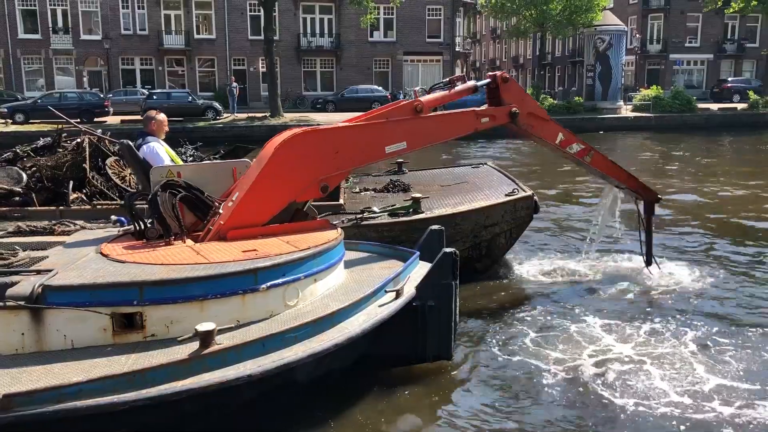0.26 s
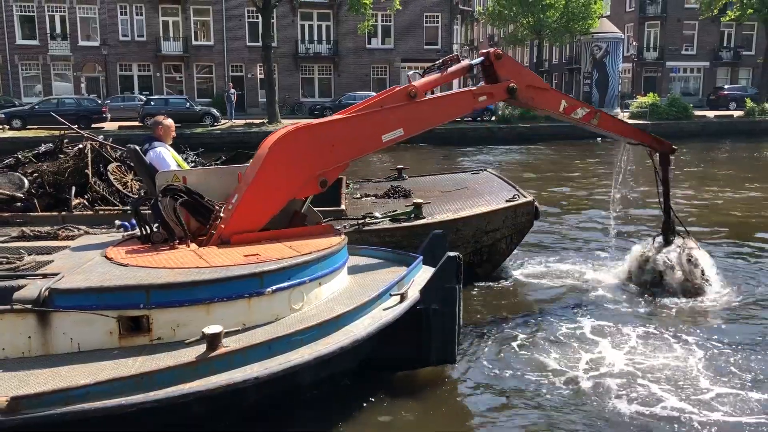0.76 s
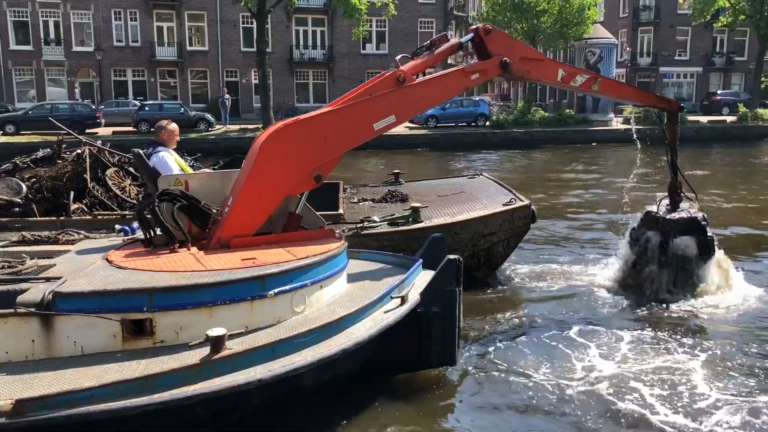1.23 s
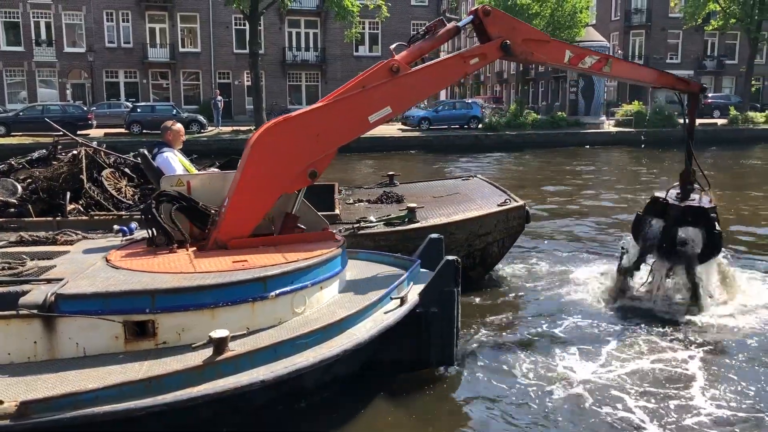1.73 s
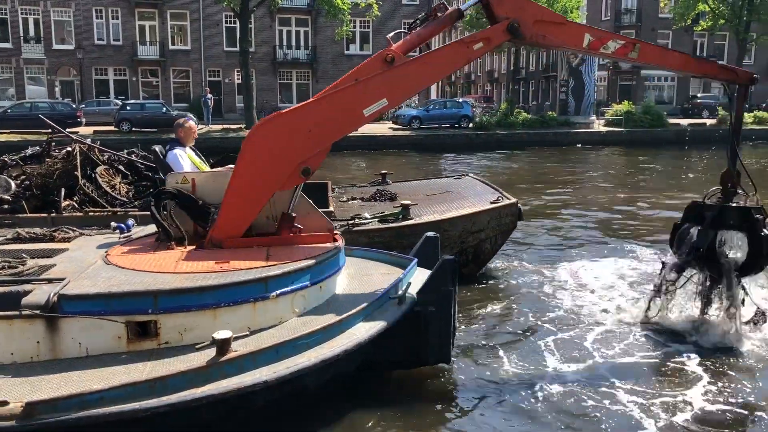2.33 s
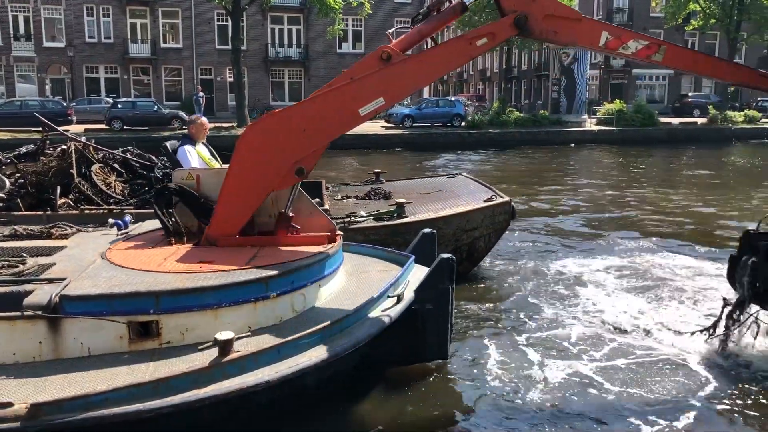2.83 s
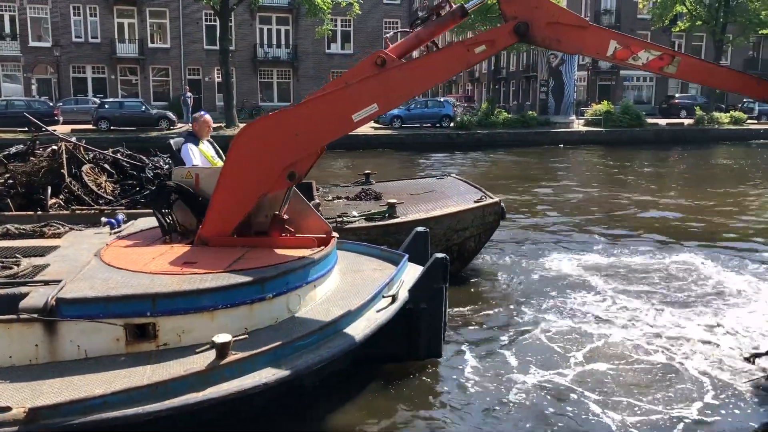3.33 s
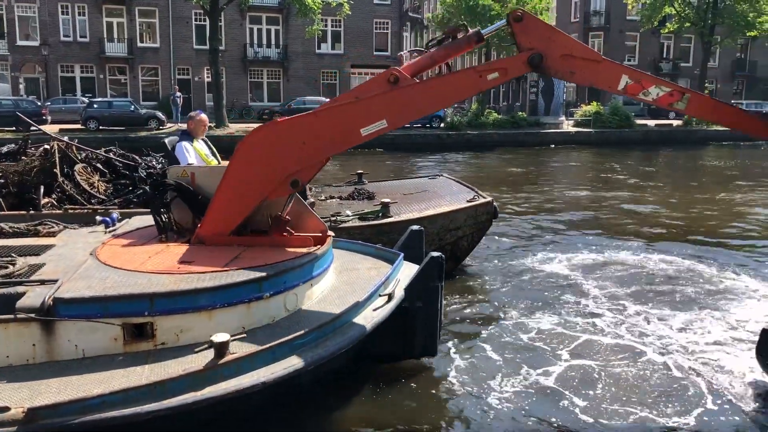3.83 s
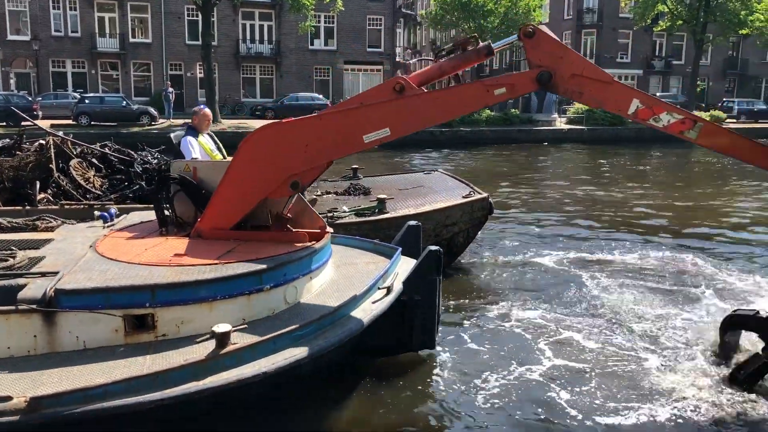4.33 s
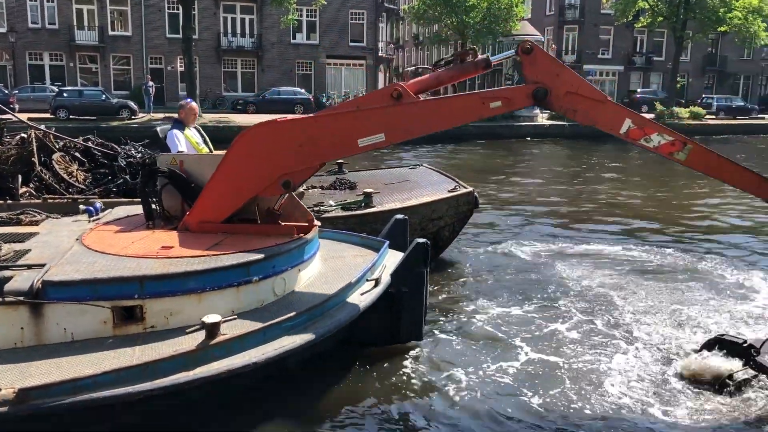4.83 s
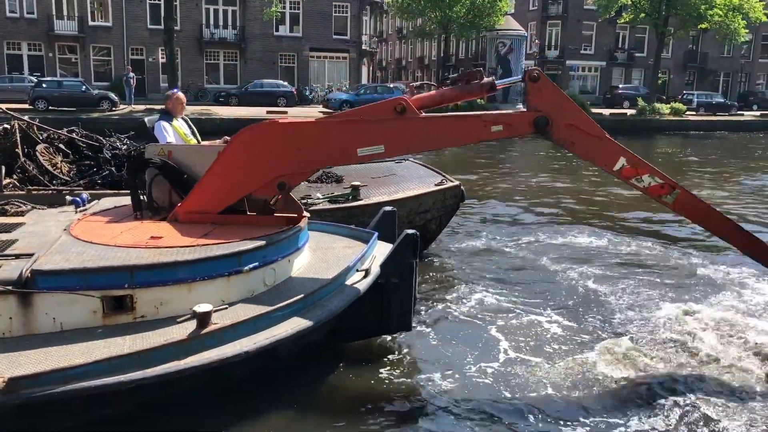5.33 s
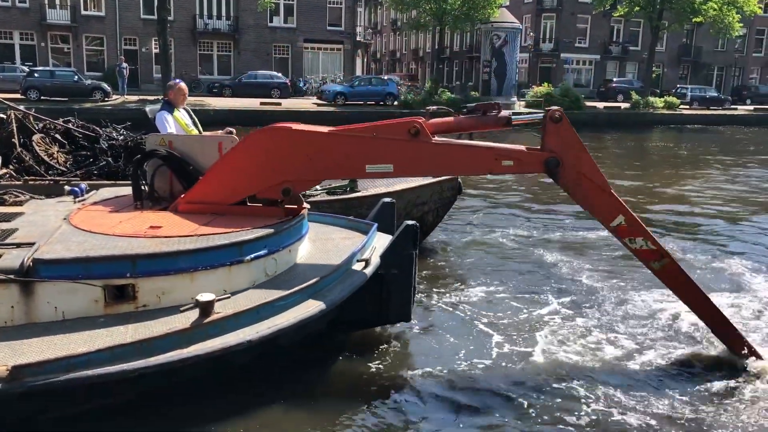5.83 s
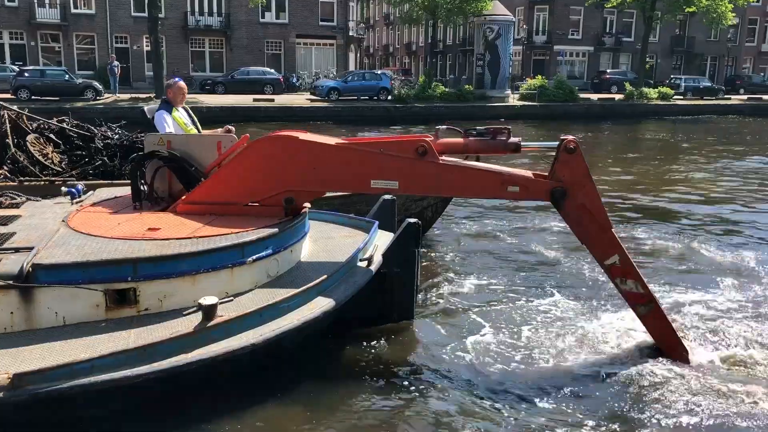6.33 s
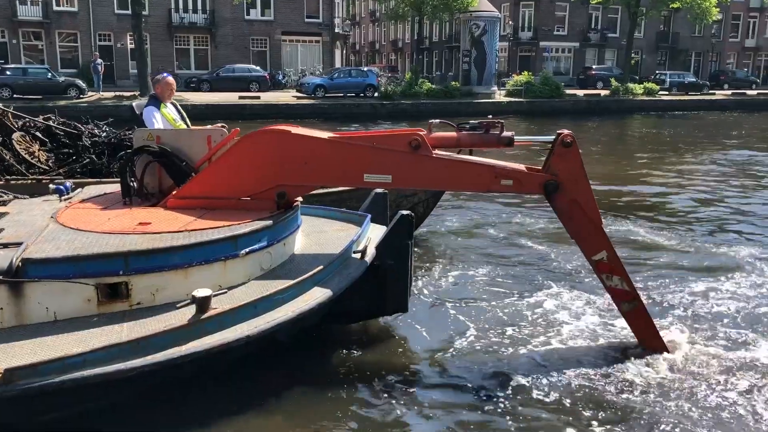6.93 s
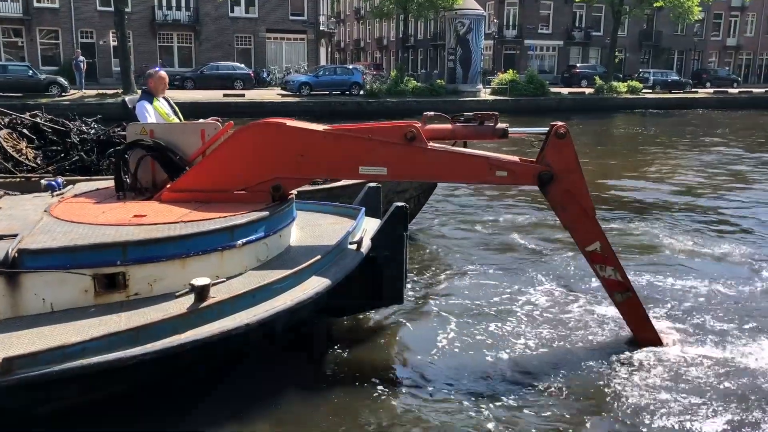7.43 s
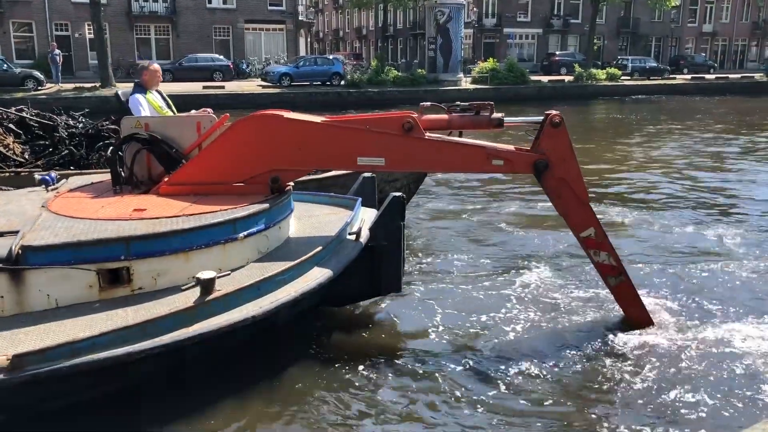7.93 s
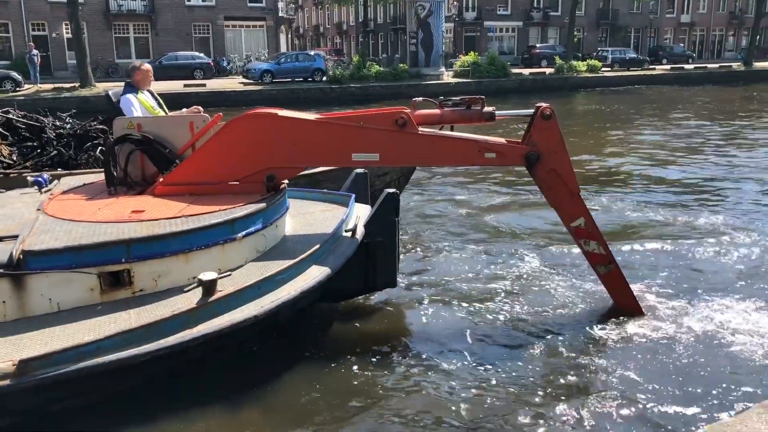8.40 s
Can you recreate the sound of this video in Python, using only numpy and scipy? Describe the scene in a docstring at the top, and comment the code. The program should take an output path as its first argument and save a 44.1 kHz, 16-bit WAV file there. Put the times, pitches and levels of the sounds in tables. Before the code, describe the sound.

Water gushes and drains from a lifted grab, followed by hollow metal knocks, clanging tines and chain clinks above a faint engine and pump hum.

```python
"""On a canal, beside a quay: a boat's hydraulic crane lifts its grab out of the water, which gushes and drains.
The water is bubbles and patchy noise in two bands; splashes, plops and drips are noise bursts and sine bubbles.
The grab clanks and scrapes, the arm knocks and chain links rattle: decaying sines and dense rings of noise.
The hydraulic pump hums in three harmonics over a throbbing engine rumble, and the quay walls answer faintly.
A small microphone takes it all in, thin in the deep bass."""
import sys
import numpy as np
from scipy import signal
from scipy.fft import rfft, irfft, next_fast_len
from scipy.io import wavfile
from scipy.ndimage import uniform_filter1d, map_coordinates

SR = 44100
rng = np.random.default_rng(int(sys.argv[2]) if len(sys.argv) > 2 else 0)


def dump_mix(stems):
    """Bounce the given channels to the path in sys.argv[1] as a 16-bit WAV at rate SR."""
    frames = np.atleast_2d(stems).T  # one column per channel
    limited = np.clip(frames, -1, 1)  # hard clip at full scale
    pcm = np.round(limited * 32767).astype(np.int16)
    wavfile.write(sys.argv[1], SR, pcm)


N = 381906

# Spectrum of fine spray and drips. Each row: frequency in Hz, density in dB per Hz.
SPRAY_SPECTRUM = [(800, -15), (2200, 1), (3300, 4), (5000, -0.5), (7000, -3), (10000, -1), (13000, -6),
                  (16000, -10)]


def water():
    """Streams plunge in as bubbles, their spray lands as tiny ringing drops; both surge together."""
    # Spectrum of the plunging water. Each row: frequency in Hz, density in dB per Hz.
    gush_spectrum = [(60, -39.5), (200, -14.5), (400, -16), (700, -6), (1050, -4.5), (1600, -3.5),
                     (2400, -11), (3300, -12.5), (5000, -26), (12000, -44.5)]
    gush_db, spray_db = flow()
    surge = wobble(19)
    plunge = bubbles(1000, .5, 45, 2, count=3500, size=1400) + 1.5 * rush(patchy_db=2.8)
    drops = bubbles(7000, .4, 160, 2.5, count=5000, size=1000) + 2.2 * rush(patchy_db=3.8)
    gush = unit(colour(plunge, lambda hz: along(gush_spectrum, hz)))
    gush = gush * amp(gush_db - 1 + 1.4 * surge)
    spray = unit(colour(drops, lambda hz: along(SPRAY_SPECTRUM, hz)))
    spray = spray * amp(spray_db + 4.0 + 1.97 * surge)
    # the finest mist, around 11 kHz and up, gains an extra 0.14 dB for each dB of spray
    mist = colour(spray, lambda hz: -40 * (1 - above(hz, 11000)) ** 4)
    mist_gain = amp(0.14 * (spray_db - spray_db.max()))
    return gush + spray + mist * (mist_gain - 1)


def flow():
    """Levels of gush and spray in dB: the lifted grab pours and drains, waves swell and sink, the canal laps."""
    # Waves thrown up by the grab and the arm. Each row: crest in seconds, gush level in dB,
    # spray level in dB, rise in seconds, fall of the gush in seconds.
    waves = [(.3, -74, -88.5, 0.44, 0.21), (2.86, -56.5, -63, 0.22, .3), (3.52, -47, -66, 0.18, 0.32),
             (3.98, -45, -57.5, 0.16, 0.13), (4.36, -60, -60.5, 0.075, 0.36), (4.75, -60, -76, .3, 0.34),
             (4.93, -71, -63.5, .15, 0.098), (5.21, -73.5, -65, 0.1, 0.42), (5.33, -57.5, -71, 0.32, 0.9),
             (5.62, -51, -90, 0.17, 0.063), (5.97, -55.5, -62.5, 0.1, 0.17), (6.33, -61, -59, 0.29, 0.097),
             (6.7, -62, -79.5, 0.46, 0.45), (8.33, -62, -64, 0.11, 0.22), (8.48, -53, -74, 0.23, 0.25)]
    # Lapping of the canal underneath. Each row: time in seconds, gush level in dB, spray level in dB.
    lapping = [(0, -69, -78), (.6, -79, -76), (6.3, -77, -85.5), (7.3, -78, -96), (7.7, -71.5, -83.5),
               (8.1, -81.5, -95.5)]
    break_s, clear_s, attack_s = 0.669, 1.884, 0.086  # the grab breaks the surface, then hangs clear of it
    gush_clear_db, spray_clear_db = -47.5, -50.5  # the pour as the grab comes clear
    spray_grows, gush_drains, spray_drains = 11.5, 15.5, 16  # dB per second
    wave_depth_db = 18  # a wave's climb over its rise time and its drop over its fall time
    spray_lingers = 1.29  # the spray's fall time over the gush's

    t = np.arange(N) / SR
    opening = np.clip((t - break_s) / attack_s, 0, 1) ** 2
    rising = np.maximum(clear_s - t, 0)
    draining = np.maximum(t - clear_s, 0)
    # the higher the grab, the farther the water falls and the more of it turns to spray
    pour_gush_db = gush_clear_db - gush_drains * draining
    pour_spray_db = spray_clear_db - spray_grows * rising - spray_drains * draining
    pour = opening * amp([pour_gush_db, pour_spray_db])
    power = pour ** 2 + amp(curves(lapping)) ** 2
    for s, gush_db, spray_db, rise, fall in waves:
        first = max(round((s - 2 * rise) * SR), 0)
        near = slice(first, round((s + 2 * fall * spray_lingers) * SR))
        before = np.maximum(s - t[near], 0) / rise
        after = np.maximum(t[near] - s, 0) / fall
        wave_gush_db = gush_db - wave_depth_db * (before + after)
        wave_spray_db = spray_db - wave_depth_db * (before + after / spray_lingers)
        power[:, near] += amp([wave_gush_db, wave_spray_db]) ** 2
    return 10 * np.log10(power)


def splashes():
    """Slabs of water slap down, big single bubbles plop and drips tick."""
    # Slabs slapping the surface. Each row: start in seconds, level in dB, centre in Hz,
    # base time to fall 60 dB in seconds.
    slaps = [(0.766, -46, 764, 0.45), (0.843, -35.5, 1680, 0.25), (0.892, -38, 2280, 0.25),
             (1.02, -42, 815, 0.19), (1.773, -46, 1703, 0.21), (1.885, -45.5, 1970, 0.47),
             (2, -43, 6470, 0.15), (2.316, -47.5, 4160, 0.22)]
    # Single bubbles and drops. Each row: start in seconds, relative level in dB, starting pitch in Hz,
    # life in cycles of that pitch.
    plops = [(.722, -24.5, 1700, 23), (1.003, -41, 3400, 130), (1.043, -35.5, 210, 7.7),
             (1.131, -29, 1070, 18), (1.158, -38, 283, 34), (2, -30, 6300, 44), (2.319, -30, 5560, 64),
             (2.84, -46.5, 592, 32), (3.206, -46.5, 406, 24), (4.261, -30, 195, 5), (4.51, -46, 498, 75),
             (5.088, -38, 193, 6.6), (6.37, -38.5, 1310, 19)]
    # Drips landing near the boat. Each row: start in seconds, relative level in dB.
    drips = [(.1473, -41.5), (.177, -47), (0.5524, -41.5), (3.483, -23.5), (3.5367, -26.5), (5.1577, -44.5),
             (5.2083, -39.5), (6.3697, -36.5), (7.8054, -51.5)]
    out, t = np.zeros(N), event_time()
    for s, db, centre_hz, t60 in slaps:
        # a slap traps bubbles around one size: a gentle slope below their pitch, a steep one above
        band = lambda hz: -4 * np.abs(np.log2((hz + 1) / centre_hz)) - 20 * above(hz, 1.81 * centre_hz)
        add(out, s, amp(db) * dense_ring(band, t60, rise=0.0032, ripple_db=5.5))
    for s, db, pitch_hz, cycles in plops:
        add(out, s, amp(db + 1.5) * bubble(t, pitch_hz, cycles, glide=0.043))
        # the water around the bubble fizzes at the same pitch
        near_pitch = lambda hz: -45 * np.abs(np.log((hz + 1) / pitch_hz))
        add(out, s, amp(db - 18.5) * dense_ring(near_pitch, t60=0.087, rise=0.0026, ripple_db=15))
    for s, db in drips:
        bright = lambda hz: along(SPRAY_SPECTRUM, hz) + 10 * above(hz, 4200)
        add(out, s, amp(db - 14.5) * dense_ring(bright, t60=0.096, rise=.0008, ripple_db=8))
    return out


def grab():
    """The tines crash together: a dense clang, coloured by the struck part, with clear modes left ringing."""
    # Blows of steel on the grab. Each row: start in seconds, relative level in dB, boom in dB, edge in dB,
    # rise in seconds, base time to fall 60 dB in seconds, pitch of the struck part in Hz, its boost in dB.
    blows = [(3.910, -21.5, -10.5, -19, 0.00094, 0.26, 4000, 14.5),
             (3.941, -25.5, 1, -12, 0.0062, 0.18, 175, 12), (3.975, -29, -2, -6, .004, 0.19, 1100, 20.5),
             (4.022, -19.5, -0.5, 0.5, 0.0024, 0.28, 3000, -1), (4.300, -43, 6, -23, 0.0013, 0.24, 500, 9),
             (4.809, -35, 7.5, -14, 0.0016, 0.58, 780, 5), (4.833, -20.5, -10, -4, 0.0049, 0.18, 3830, 7),
             (4.848, -23, 6, 0, 0.003, .17, 316, 7), (4.864, -33, -7, -8, 0.0031, 0.26, 1620, 19.5),
             (5.378, -39.5, -13.5, -14, 0.0035, 0.24, 1550, 12.5),
             (5.546, -40.5, -22, -2, 0.01, 0.13, 1600, 0), (5.556, -33, -21, -9, 0.0097, 0.22, 966, 6.5),
             (6.499, -34, -4, 5.5, 0.006, 0.13, 3480, 13), (6.582, -34, 26, -4, 0.0044, 0.12, 128, 5),
             (8.267, -30.5, -17.5, -16, 0.0031, 0.26, 2740, 14)]
    # Modes of the grab. Each row: frequency in Hz, relative level in dB,
    # time to fall 60 dB in seconds for a blow of 0.3 s.
    grab_modes = [(172.2, -13.5, .28), (254.5, 4, 0.33), (344.3, 5.5, 0.23), (416, -4, 0.22),
                  (573, -3, 0.43), (693.5, -1, 0.24), (870, -7.5, 0.099), (992, -6, 0.13),
                  (1450, -13, 0.17), (1648, -1.5, 0.31), (1886, -4.5, 0.22), (2169, -2.5, 0.23),
                  (2640, -8.5, 0.28), (2880, -7, 0.11), (3280, -6.5, 0.14), (3800, -10, 0.1),
                  (4180, -12, 0.24), (5262, -14.5, 0.083), (5760, -29, 0.13)]
    # Spectrum of the clang before each blow's tilt. Each row: frequency in Hz, density in dB per Hz.
    clang_spectrum = [(30, -43), (70, -20), (170, -0.5), (420, 1.5), (1000, -5.5), (1400, -5.5),
                      (2000, -7.5), (2500, -9), (3300, -10.5), (4500, -20), (6500, -27), (10000, -35.5),
                      (16000, -51)]
    out = np.zeros(N)
    for s, db, boom_db, edge_db, rise, t60, part_hz, part_db in blows:
        part = lambda hz: part_db * np.exp(-(np.log((hz + 1) / part_hz) / 0.26) ** 2)
        tilt = lambda hz: boom_db * (1 - above(hz, 480)) + edge_db * above(hz, 2100) + part(hz)
        clang = dense_ring(lambda hz: along(clang_spectrum, hz) + tilt(hz), t60, rise, ripple_db=8)
        # a tight contact damps the modes as it damps the clang
        struck = [(hz, level + tilt(hz), life * t60 / 0.3) for hz, level, life in grab_modes]
        modes = clear_ring(struck, rise, scatter_db=0.5)
        add(out, s, amp(db - 0.5) * clang + amp(db - 8.5) * modes)
    return out


def scrapes():
    """Sliding steel catches and slips, so its ring chatters; its resonances shift as the contact moves."""
    # Steel sliding and rattling on steel, and a hard chain clink at 7.18 s. Each row: start in seconds,
    # relative level in dB, treble tilt in dB, base time to fall 60 dB in seconds.
    contacts = [(3.451, -32, -11, 0.65), (3.479, -38, 8.5, .15), (3.509, -34.5, 8, 0.17),
                (3.537, -38, 15, .15), (3.78, -52, -14, 0.18), (3.987, -40.5, 14.5, 0.39),
                (7.179, -49.5, 1, 0.18), (7.211, -45.5, -7, 0.25), (7.9, -67.5, 12, 0.25),
                (8.290, -32.5, -3, 0.65), (8.317, -32, 1, 0.35), (8.357, -35, 2.5, 0.18),
                (8.408, -37.5, 1.5, 0.32), (8.511, -32, -3.5, 0.27)]
    # Spectrum of a contact before its treble tilt. Each row: frequency in Hz, density in dB per Hz.
    contact_spectrum = [(30, -20.5), (70, 0), (300, -23), (520, -2.5), (750, -10), (1400, -6.5),
                        (2200, 1.5), (3200, 0), (4000, -7), (6500, -14.5), (10000, -22), (16000, -38)]
    out = np.zeros(N)
    for s, db, treble_db, t60 in contacts:
        shape = lambda hz: along(contact_spectrum, hz) + treble_db * above(hz, 5600)
        add(out, s, amp(db) * dense_ring(shape, t60, rise=0.0023, ripple_db=6))
    chatter = amp(0.57 * wobble(160) - 1)
    return patches(out, patchy_db=2.5) * chatter


def arm():
    """Play in the joints knocks the hollow arm; harder knocks wake the higher modes."""
    # Knocks. Each row: start in seconds, relative level in dB, hardness in dB, nominal pitch of the knock in Hz.
    knocks = [(3.344, -38, -14, 444), (3.424, -41.5, 1.5, 635), (3.455, -37.5, -3.5, 654),
              (3.609, -18, -1, 365), (3.863, -30, -24, 310), (4.025, -16.5, -7, 365),
              (5.661, -41.5, -46, 251), (5.868, -52.5, -10, 380), (6.501, -25, 15.5, 459),
              (6.563, -30, 0.5, 390), (6.706, -25, -9, 381), (7.152, -23, 5.5, 373),
              (7.972, -28.5, 8, 358.6), (8.484, -39, -16, 556)]
    # Modes of the arm, stretched halfway, in octaves, towards each knock's pitch. Each row: frequency in Hz,
    # relative level in dB, time to fall 60 dB in seconds.
    arm_modes = [(390, 7.5, 0.066), (445, -17, 0.069), (533, -1, 0.043), (677.4, -14, 0.25),
                 (840, -18, 0.12), (1050, -29, 0.029)]
    # Spectrum of the hollow boom before its tilt. Each row: frequency in Hz, density in dB per Hz.
    hollow_spectrum = [(30, -32), (70, -7), (140, -11.5), (220, -4.5), (370, 1), (680, 3), (900, -7),
                       (1250, -19), (1700, -40.5), (5000, -66.5)]
    out = np.zeros(N)
    for s, db, hard_db, nominal_hz in knocks:
        stretch = np.sqrt(nominal_hz / arm_modes[0][0])
        tilt = lambda hz: hard_db * above(hz, 710)
        struck = [(hz * stretch, level + tilt(hz), t60) for hz, level, t60 in arm_modes]
        knock = clear_ring(struck, rise=.0025, scatter_db=1)
        thud = lambda hz: -.7 * max(hard_db + 4, -6) * (1 - above(hz, 150))  # soft knocks carry more bass
        shape = lambda hz: along(hollow_spectrum, hz) + 1.2 * tilt(hz) + thud(hz)
        boom = dense_ring(shape, t60=0.24, rise=0.0015, ripple_db=-2.5)
        add(out, s, amp(db - 4.5) * knock + amp(db - 8) * boom)
    return out


def chain():
    """Each link rings briefly in its resonances, at its own pitch."""
    # Modes of a link, shifted to each contact's pitch. Each row: frequency in Hz, width in Hz,
    # relative level in dB.
    link_modes = [(2199, 210, 0.5), (2721, 290, 11.5), (3100, 240, -1.5), (4470, 520, -16.5),
                  (5175, 540, -13.5), (6340, 400, -24.5), (7820, 340, -22.5)]
    out = np.zeros(N)
    for s, db, pitch_hz in clinks(run_count=6, rebound_count=3):
        stretch = pitch_hz / link_modes[1][0]  # the second mode, the strongest, sets the pitch
        peak = lambda hz, centre, width: 1 / (1 + ((hz - centre * stretch) / (width / 2)) ** 2)
        link = lambda hz: 20 * np.log10(sum(amp(level) * peak(hz, centre, width)
                                            for centre, width, level in link_modes))
        add(out, s, amp(db - 9) * dense_ring(link, t60=0.09, rise=0.0014, ripple_db=7.5))
        add(out, s, amp(db - 21.5) * dense_ring(link, t60=0.25, rise=0.0084, ripple_db=7.0))
    return out


def clinks(run_count, rebound_count):
    """Rows (s, dB, Hz) of link contacts: one quickening run, then tugs that rebound; a taut chain rings higher."""
    # Tugs on the chain. Each row: start in seconds, relative level in dB, loss per rebound in dB.
    tugs = [(3.4498, -21.5, 11), (3.5887, -33.5, 16), (3.638, -27.5, 7.5), (3.7435, -46, 12),
            (4.1806, -43.5, 21), (4.3808, -42.5, 18), (4.5501, -51.5, 5), (4.914, -35, 7),
            (5.485, -35.5, 16), (5.675, -47, 24), (6.0082, -46, 10), (6.5822, -31.5, 11), (6.728, -42, 14),
            (6.9047, -50, 22), (7.2071, -32.5, 4), (7.2238, -40, 18), (7.611, -34, 3), (7.6804, -31.5, 8),
            (8.0701, -39.5, 5.5)]
    run_s, taut_s, slack_s = 3.352, 3.422, 3.72  # the run starts, the chain is taut, it is slack again
    start_db, end_db, quickens = -35.5, -25.5, 0.59  # an exponent below 1 makes the run quicken
    link_hz, taut_rise_hz, scatter_hz = 2723, 616, 50
    rebound_s = .034  # between a link's contacts
    progress = np.linspace(0, 1, run_count)
    run_times = run_s + (taut_s - run_s) * progress ** quickens
    run = np.column_stack([run_times, start_db + (end_db - start_db) * progress])
    pulls = [(s + k * rebound_s, db - k * loss_db) for s, db, loss_db in tugs for k in range(rebound_count)]
    ticks = [(s - rebound_s, db - 18) for s, db, _ in tugs]  # a tick takes up the slack before each tug
    s, db = np.vstack([run, pulls, ticks]).T
    tension = np.interp(s, [run_s, taut_s, slack_s], [0, 1, 0])
    return zip(s, db, link_hz + taut_rise_hz * tension + scatter_hz * rng.standard_normal(len(s)))


def machinery():
    """The pump's pistons hum in a few harmonics over the throbbing engine."""
    # Pitch of the pump before its flutter. Each row: time in seconds, frequency in Hz.
    pump_pitch = [(0, 239), (.75, 237.8), (1.2, 234.5), (1.7, 233.1), (2.2, 241.2), (3, 244.9), (5, 238),
                  (7, 235.6), (8.66, 240.6)]
    # Relative level of the hum as heard. Each row: time in seconds, level in dB.
    hum_level = [(0, -64.5), (.7, -67.5), (1.05, -52), (1.4, -58.5), (1.7, -64.5), (2.2, -66.5), (2.8, -75),
                 (3.75, -75), (4.1, -56.5), (4.4, -63.5), (4.8, -60.5), (5.4, -74), (6.4, -78), (6.9, -72),
                 (7.85, -67), (8.15, -86), (8.35, -65), (8.66, -65)]
    # Spectrum of the engine rumble. Each row: frequency in Hz, density in dB per Hz.
    engine_spectrum = [(25, -19.5), (42, -5.5), (58, -2), (90, 0.5), (130, -4), (200, -1), (450, -8.5),
                       (750, -17.5), (1500, -24.5), (4000, -41.5)]
    pitch_hz, = curves(pump_pitch)
    hum_db, = curves(hum_level)
    rumble_db = -68 + 0.53 * (hum_db - hum_db.mean())  # the rumble swells and sinks partly with the hum
    phase = 2 * np.pi * np.cumsum(pitch_hz * (1 + 0.0097 * wobble(22))) / SR
    hum = sum(amp(db + 2.8 * wobble(12)) * np.sin(k * phase) for k, db in enumerate([0, -7, -20], 1))
    firing_hz = 29
    throb = 1 + .5 * np.sin(2 * np.pi * firing_hz * np.arange(N) / SR)
    rumble = unit(colour(rng.standard_normal(N) * throb, lambda hz: along(engine_spectrum, hz)))
    return amp(hum_db + 3.0) * unit(hum) + amp(rumble_db + 0.92 * wobble(13)) * rumble


def quay(x):
    """A diffuse answer from the hull and the canal walls: decaying noise that starts 20 ms late."""
    # Decay of the answer. Each row: frequency in Hz, time to fall 60 dB in seconds.
    wall_decay = [(200, 1), (2000, 0.36), (10000, 1)]
    hz, t, z = signal.stft(rng.standard_normal(SR), SR, nperseg=256)
    decay = amp(-60 * t / along(wall_decay, hz)[:, None])
    tail = signal.istft(z * decay, SR, nperseg=256)[1]
    return signal.fftconvolve(x, np.pad(tail, (SR // 50, 0)) / np.linalg.norm(tail))[:N]


def dense_ring(gain_db, t60, rise, ripple_db):
    """A crowd of overlapping modes, some stronger than their neighbours; the treble dies sooner."""
    # Damping of the ring. Each row: frequency in Hz, ring time as a share of t60.
    damping = [(100, 1.05), (500, 1.46), (1200, 0.95), (3000, 0.91), (6000, 0.67), (12000, 0.52)]
    t = event_time()
    hz, when, z = signal.stft(rng.standard_normal(len(t)), SR, nperseg=256)
    decay = amp(-60 * when / (t60 * along(damping, hz)[:, None]))
    ring = signal.istft(z * decay, SR, nperseg=256)[1][:len(t)]
    ripple = ripple_db * np.tanh(rng.standard_normal(len(hz))) * above(hz, 810)
    ring = colour(ring, lambda f: gain_db(f) + np.interp(f, hz, ripple))
    return crest(ring * (1 - np.exp(-(t / rise) ** 2)))


def clear_ring(modes, rise, scatter_db):
    """Separate modes, decaying sines struck at new strengths each time."""
    t = event_time()
    hz, db, t60 = np.transpose(modes)[:, :, None]
    size = amp(db + scatter_db * rng.standard_normal(hz.shape) - 60 * t / t60)
    tones = size * np.sin(2 * np.pi * (hz * t + rng.random(hz.shape)))
    return crest(np.sum(tones, axis=0) * (1 - np.exp(-(t / rise) ** 2)))


def bubble(t, hz, cycles, glide):
    """A bubble rings for some cycles and rises in pitch as it nears the surface."""
    age = t * hz / cycles
    tone = np.sin(2 * np.pi * hz * t * (1 + glide * np.minimum(age, 1)))
    return tone * amp(-60 * age) * (1 - np.exp(-2 * hz * t))


def bubbles(centre_hz, spread, cycles, size_db, count, size):
    """A cloud of bubbles of random pitch and strength, rms 1; each lasts size samples."""
    start = rng.integers(0, N, count)[:, None]
    hz = np.minimum(centre_hz * np.exp(spread * rng.standard_normal((count, 1))), SR / 3)
    strength = amp(size_db * np.minimum(rng.exponential(size=(count, 1)), 4))
    k = np.arange(size)
    cloud = strength * bubble(k / SR, hz, cycles, glide=.025)
    return unit(np.bincount((start + k).ravel(), cloud.ravel())[:N])


def rush(patchy_db):
    """Patchy noise of rms 1, like countless unresolved bubbles."""
    return unit(patches(rng.standard_normal(N), patchy_db))


def patches(x, patchy_db):
    """Let x swell and sink in narrow, short patches of time and frequency."""
    z = signal.stft(x, nperseg=512)[2]
    patch = np.outer(np.hanning(7), np.hanning(11))
    field = signal.convolve2d(rng.standard_normal(z.shape), patch, "same")
    return signal.istft(z * amp(patchy_db * unit(field)), nperseg=512)[1][:N]


def amp(db):
    """Decibels to gain."""
    return 10 ** (np.asarray(db) / 20)


def unit(x):
    """Scale to rms 1."""
    return x / np.sqrt(np.mean(x ** 2) + 1e-20)


def crest(x):
    """Scale so that the loudest few milliseconds have rms 1."""
    return x / np.sqrt(uniform_filter1d(x ** 2, size=400).max() + 1e-20)


def along(points, hz):
    """Read (Hz, value) points off a log frequency axis."""
    f, v = np.transpose(points)
    return np.interp(np.log(hz + 1), np.log(f + 1), v)


def curves(rows):
    """One value per sample for each column after the time."""
    s, *cols = np.transpose(rows)
    return [np.interp(np.arange(N) / SR, s, c) for c in cols]


def wobble(rate):
    """A smooth random curve, rate knots a second."""
    return map_coordinates(rng.standard_normal(2048), [np.arange(N) * rate / SR], mode="wrap")


def colour(x, gain_db):
    """Filter x by a dB function of frequency."""
    m = next_fast_len(len(x) + 4096)
    return irfft(rfft(x, m) * amp(gain_db(np.fft.rfftfreq(m, 1 / SR))), m)[:len(x)]


def above(hz, edge_hz):
    """A smooth step from 0 to 1 around an edge frequency."""
    return hz ** 4 / (hz ** 4 + edge_hz ** 4)


def add(track, s, sound):
    """Mix a sound into the track at time s."""
    part = track[max(round(s * SR), 0):][:len(sound)]
    part += sound[:len(part)]


def event_time():
    """The time axis of one event, half a second long."""
    return np.arange(SR // 2) / SR


def scene():
    """Steelwork, water and machinery on the open canal."""
    steel = grab() + scrapes() + arm() + chain()
    return (steel + amp(-30.0) * quay(steel) + water() + splashes() + machinery())[None]


def record(dry):
    """The small microphone loses the deep bass below 48 Hz; the recorder cuts off sharply at 15.79 kHz."""
    thin = signal.sosfilt(signal.butter(4, 48, "highpass", fs=SR, output="sos"), dry)
    return np.array([colour(x, lambda hz: -120 * (hz > 15790)) for x in thin])


dry = scene()
out = record(dry)
dump_mix(out)
```